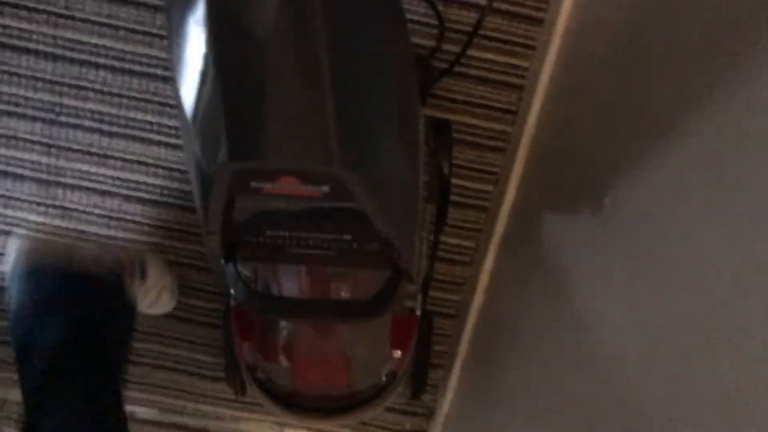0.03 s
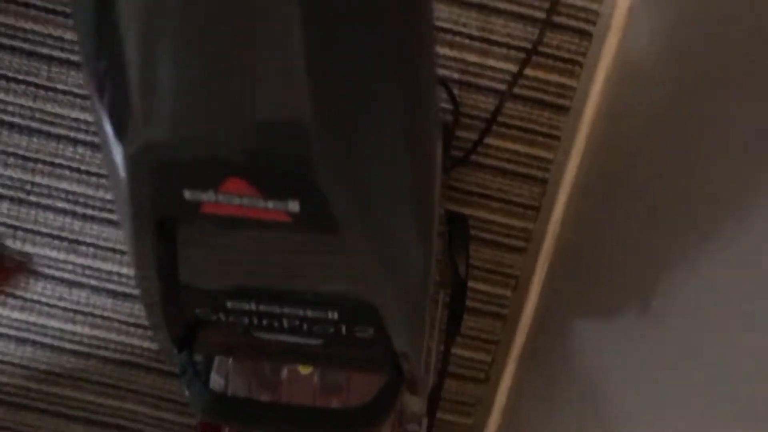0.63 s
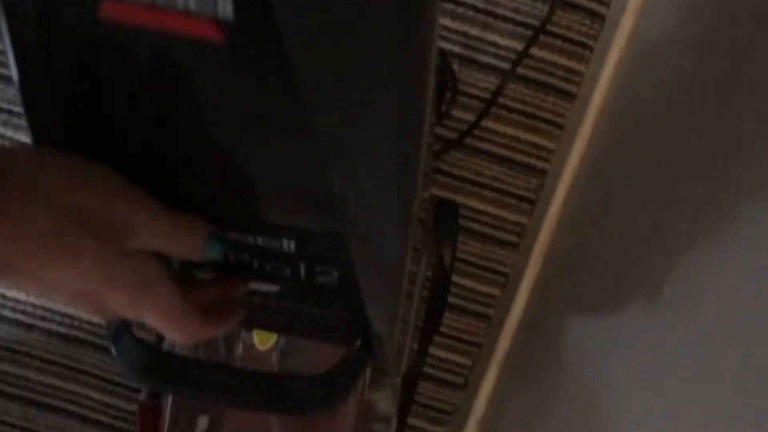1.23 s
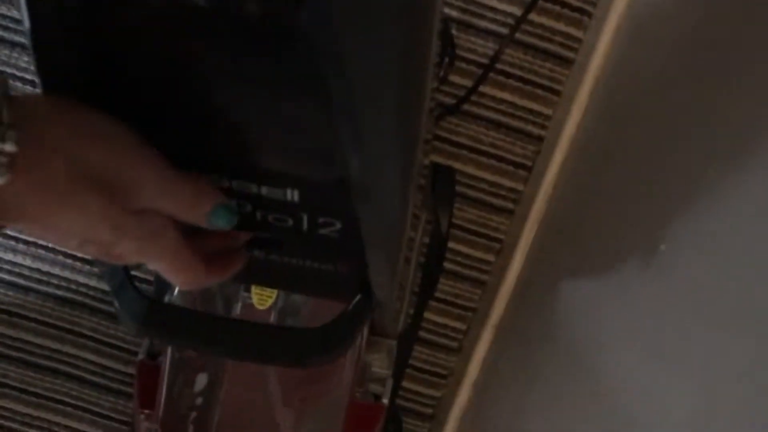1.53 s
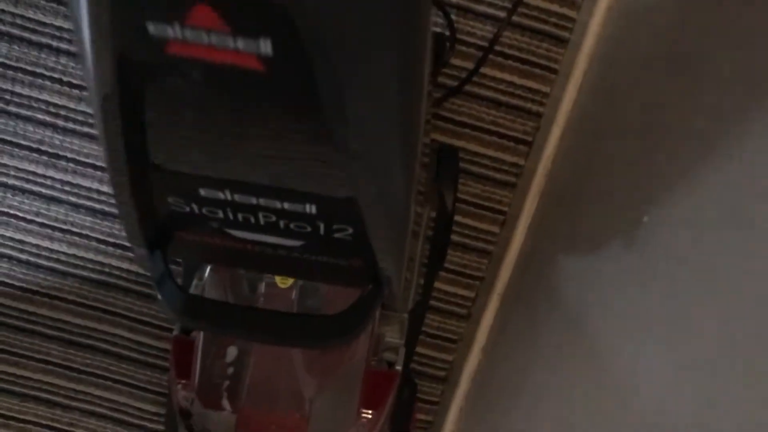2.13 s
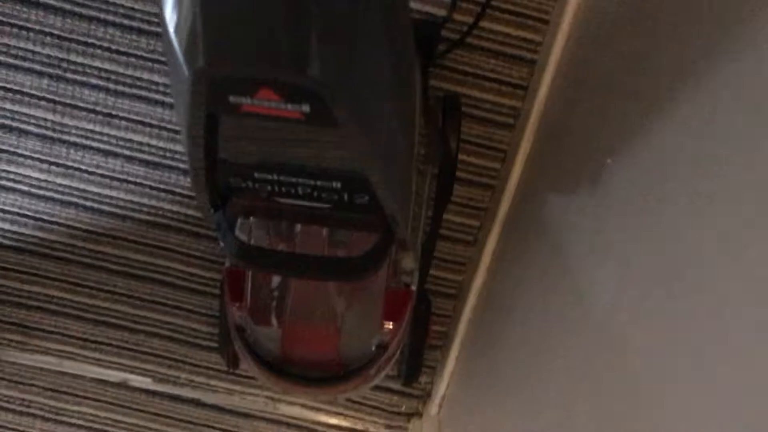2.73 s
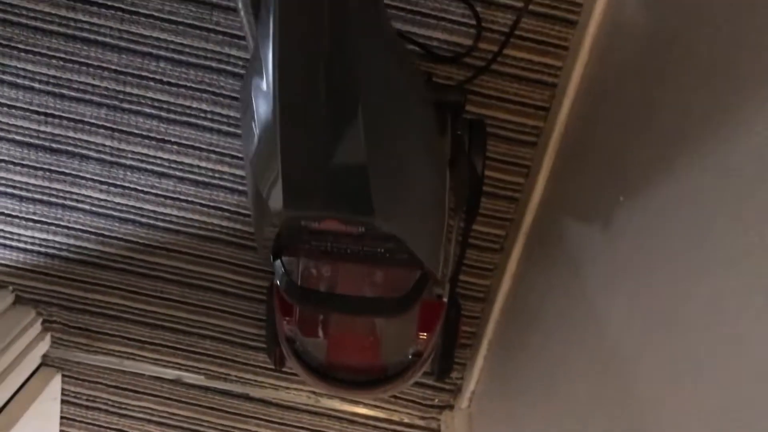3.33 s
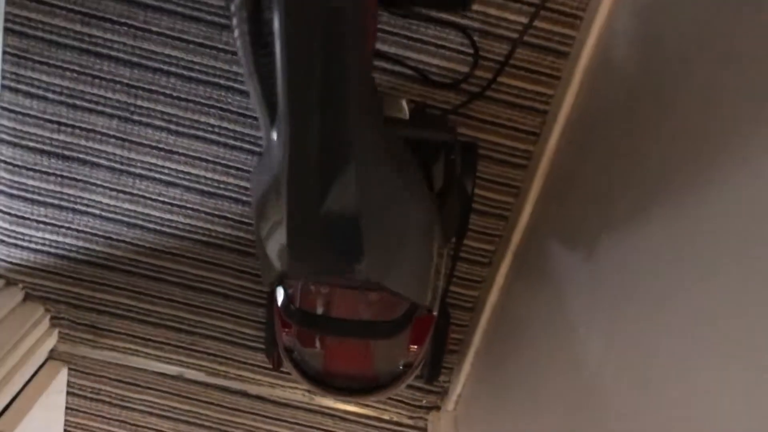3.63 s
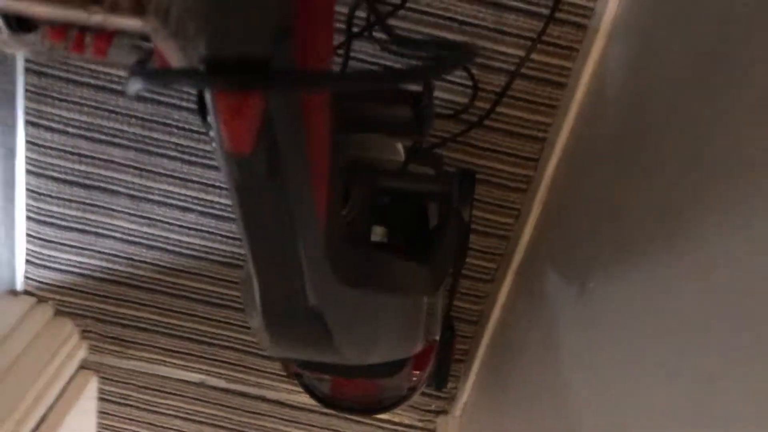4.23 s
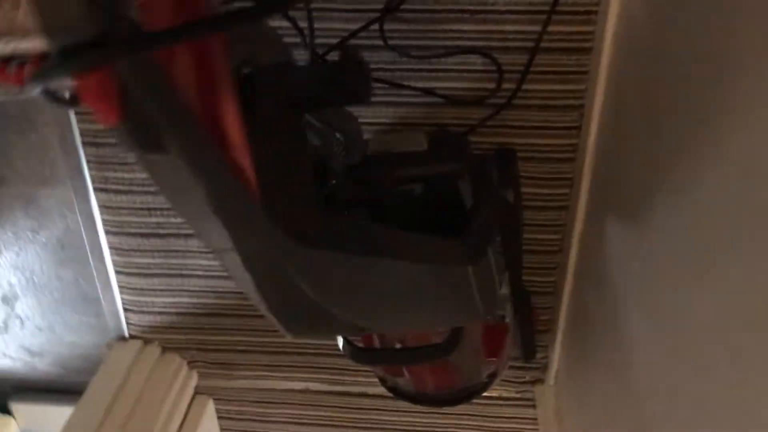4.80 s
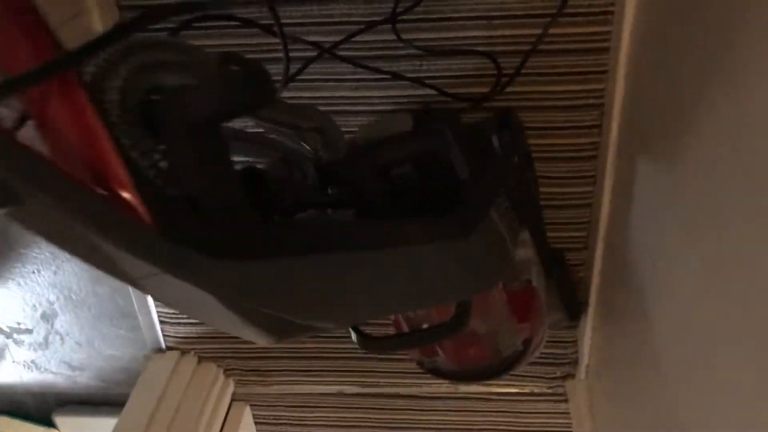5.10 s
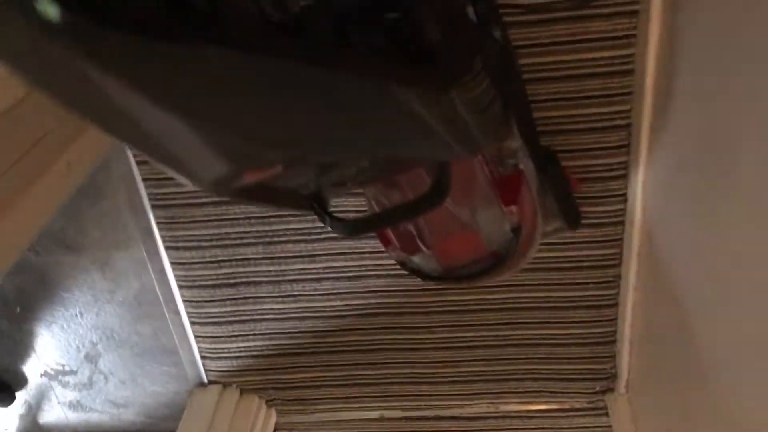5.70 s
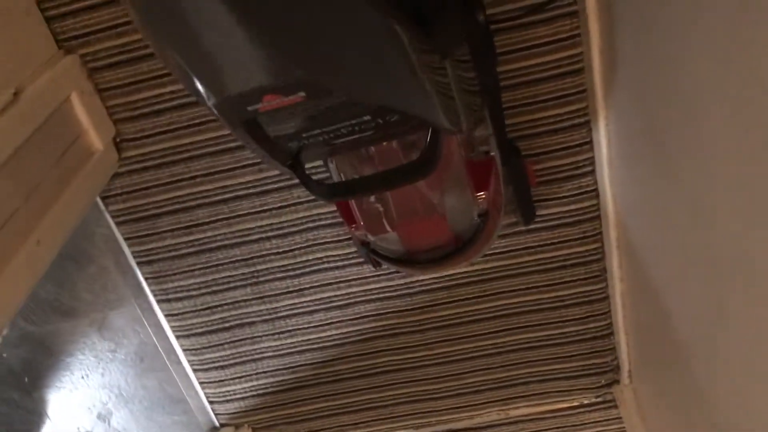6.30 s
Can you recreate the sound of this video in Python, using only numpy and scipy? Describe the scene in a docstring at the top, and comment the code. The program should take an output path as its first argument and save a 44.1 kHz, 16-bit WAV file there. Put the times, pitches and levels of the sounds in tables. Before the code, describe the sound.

Clothes rustle faintly, with small plastic ticks and a dull bump, as an upright carpet cleaner is handled close to the microphone in a small carpeted room. A switch clicks and the motor whines quickly up to a loud, steady roar of air, with a high whistle and a low brush hum. A sharp click follows soon after, and near the end the plastic body clunks while the motor keeps running.

```python
"""A small carpeted room, where an upright carpet cleaner is handled and switched on near a hand-held
microphone. The suction motor whines up to speed, its tones locked to the rotation of its shaft, over
turbulent air that resonates in plastic ducts. A second motor hums and turns the brush roll.
Clothes rustle by friction and plastic clicks before the start; later the body is tilted back and
clunks as the impacts excite its modes."""
import sys
import numpy as np
from scipy import signal
from scipy.fft import rfft, irfft
from scipy.io import wavfile

SR = 44100
rng = np.random.default_rng(int(sys.argv[2]) if len(sys.argv) > 2 else 0)


def wav_out(sig):
    """Save sig, one row per channel (or a flat mono array), as 16-bit PCM at SR to the path in sys.argv[1]."""
    wavfile.write(sys.argv[1], SR, np.round(np.clip(np.atleast_2d(sig).T, -1, 1) * 32767).astype(np.int16))


N = 288855
T = np.arange(N) / SR
HZ = np.maximum(np.arange(N // 2 + 1) * SR / N, 1)
RUNNING_S = np.maximum(T - 1.5, 0)   # time since switch-on
FULL_SPEED_HZ = 641.18

# directivity, how openly the motors face the microphone: time_s, gain_db
MOTOR_DIRECTIVITY = [(1.5, 13.5), (2.1, 9.5), (3.2, 8.5), (3.8, 3.5), (4.5, 5), (5.1, 8), (6.55, 2.5)]
# the same for the side with the exhaust vent and belt: time_s, gain_db
SIDE_DIRECTIVITY = [(1.5, 2.5), (2.9, -2.5), (3.8, 1), (4.5, 2.5), (5.15, 4.5), (5.55, 2.5), (5.85, -1.5),
                    (6.05, 1.5), (6.55, -1)]


def from_db(db):
    """Amplitude ratio of a level in decibels."""
    return 10 ** (np.asarray(db) / 20)


def rms_one(x):
    """Normalisation to unit rms."""
    return x / np.sqrt(np.mean(x ** 2) + 1e-20)


def in_time(rows):
    """Linear interpolation of (time_s, value) rows at every sample."""
    return np.interp(T, *np.transpose(rows))


def colour(points):
    """Spectral envelope, interpolated over log frequency."""
    hz, db = np.transpose(points)
    return from_db(np.interp(np.log(HZ), np.log(hz), db))


def resonances(peaks):
    """Frequency response of Lorentzian peaks and dips, summed in decibels."""
    return from_db(sum(db / (1 + (2 * (HZ - hz) / width) ** 2) for hz, width, db in peaks))


def noise(gain):
    """White noise filtered by a frequency response; rms 1."""
    return rms_one(irfft(rfft(rng.standard_normal(N)) * gain, N))


def resonant_noise(hz, width_hz):
    """Narrow-band noise, shaped by the squared response of a damped resonator; rms 1."""
    return noise(1 / (1 + ((HZ ** 2 - hz ** 2) / (HZ * width_hz)) ** 2))


def drift(rate_hz):
    """Random modulation: low-pass Gaussian noise with a spread near 1."""
    size, stride = 8192, 36
    hz = np.arange(size // 2 + 1) * SR / (stride * size)
    slow = irfft(rfft(rng.standard_normal(size)) * np.exp(-(hz / rate_hz) ** 2))
    return np.interp(T, np.arange(size) * stride / SR, rms_one(slow))


def turning(speed_hz, wobble):
    """Shaft angle as the integral of a slightly uneven speed."""
    return 2 * np.pi * np.cumsum(speed_hz * (1 + wobble * drift(12.44))) / SR


def tone(angle, scatter, rate_hz):
    """Interference: a partial beats with its reflections as the microphone moves; rms near 1."""
    reflected = drift(rate_hz) * np.sin(angle) + drift(rate_hz) * np.cos(angle)
    return (np.sqrt(2) * np.sin(angle) + scatter * reflected) / np.sqrt(1 + 2 * scatter ** 2)


def fan_speed():
    """Exponential run-up in turns per second: fast, slower under load, then a creep as the motor warms."""
    kick_share, kick_s, settle_s, creep_hz_per_s = .418, .0662, .2758, .661
    lag = kick_share * np.exp(-RUNNING_S / kick_s) + (1 - kick_share) * np.exp(-RUNNING_S / settle_s)
    return FULL_SPEED_HZ * (1 - lag) + creep_hz_per_s * RUNNING_S


def speed_share():
    """Fan speed as a fraction of full speed."""
    return np.clip(fan_speed() / FULL_SPEED_HZ, .01, 1)


def suction_motor():
    """Periodic forcing: imbalance sounds once a turn; fan and commutator whistle twelve times a turn."""
    # shaft tone as the microphone moves through its standing waves: time_s, level_db
    shaft_level = [(1.58, -42), (1.7, -17.5), (1.8, -26), (2.0, -21.5), (2.12, -16), (2.27, -21),
                   (2.48, -21), (2.66, -27.5), (3.3, -22.5), (4.0, -20), (4.48, -23), (4.71, -39),
                   (4.88, -26.5), (5.33, -27), (5.5, -39.5), (5.86, -22), (6.1, -21.5), (6.5, -16)]
    # fan whistle: time_s, level_db
    whistle_level = [(1.58, -60), (1.635, -29), (2.2, -35), (2.33, -28.5), (2.9, -29), (2.99, -38),
                     (3.1, -24.5), (3.4, -30), (3.85, -36.5), (4.15, -35), (4.36, -27), (4.73, -35),
                     (4.97, -27), (5.5, -41), (5.8, -33), (6.05, -43), (6.36, -29), (6.55, -43)]
    # weaker partials, the non-integer one likely from a ball bearing: shaft_multiple
    multiples = [2, 2.6, 3, 4]
    # their strengths: relative_db
    partial_db = [-41.5, -54.5, -44, -51.5]
    facing_db = in_time(MOTOR_DIRECTIVITY)
    angle = turning(fan_speed(), wobble=0.00044)
    # while the pitch climbs, late reflections are out of tune and the tones flutter
    climb = np.sqrt(1 - speed_share())
    shaft = from_db(in_time(shaft_level)) * tone(angle, scatter=0.12 + 0.21 * climb, rate_hz=29)
    whistle = from_db(in_time(whistle_level)) * tone(12 * angle, scatter=0.27 + 2.6 * climb, rate_hz=28)
    partials = sum(from_db(db) * tone(k * angle, scatter=1.0, rate_hz=17)
                   for k, db in zip(multiples, partial_db))
    overtone = from_db(-45 + .7 * facing_db) * speed_share() * tone(24 * angle, scatter=0.97, rate_hz=6)
    return shaft + whistle + overtone + from_db(facing_db) * speed_share() ** 1.2 * partials


def air_flow(level_db, flutter_db, attack_s):
    """Turbulence excites duct resonances; the low roar comes at once, the hiss builds with fan speed."""
    # spectrum of the turbulence: frequency_hz, density_db
    turbulence = [(25, -26), (50, -11), (112, -7.5), (165, 10.5), (260, 2.5), (340, 3.5), (520, -0.5),
                  (900, -5), (1700, -4), (2080, -9), (2900, -4), (5500, -7.5), (10300, -15.5), (15500, -18)]
    # duct resonances: centre_hz, width_hz, lift_db
    ducts = [(105, 4.3, 20), (318.9, 7.6, 10), (1810, 23, 3), (2305, 165, 8.5), (2560, 48, 5),
             (3115, 45, 7), (5960, 190, 7), (6570, 90, 6), (8700, 900, 3), (10240, 290, -4),
             (12000, 1100, 4)]
    # rumble, rush, hiss and top bands: centre_hz, gain_db, speed_exponent, motor_weight, side_weight
    bands = [(312, -1.5, -0.43, 0.016, -0.25), (1110, -0.4, 0.18, 0.44, 0.15),
             (3940, 0.1, 1.9, -0.077, 0.71), (10000, 1.5, 1.66, 0.2, -0.09)]
    roar_spectrum = rfft(noise(colour(turbulence) * resonances(ducts)))
    facing_db, side_db = in_time(MOTOR_DIRECTIVITY), in_time(SIDE_DIRECTIVITY)
    shares = np.array([np.exp(-(np.log(HZ / hz) / 0.78) ** 2) + 1e-100 for hz, *_ in bands])
    shares /= shares.sum(axis=0)   # the overlapping bands sum to 1
    out = np.zeros(N)
    for (_, db, exponent, motor_weight, side_weight), share in zip(bands, shares):
        band_db = db + motor_weight * facing_db + side_weight * side_db + flutter_db * drift(20)
        out += irfft(roar_spectrum * share, N) * speed_share() ** exponent * from_db(band_db)
    onset = 1 - np.exp(-(RUNNING_S / attack_s) ** 2)
    return from_db(level_db) * onset * out


def brush_drive(belt_ratio, run_up_s):
    """Rotational harmonics: the roll hums on the carpet; its faster belt motor adds drone and whine."""
    # roll speed, shifting with the drag of the carpet: time_s, speed_hz
    loaded_speed = [(1.5, 69.2), (2.3, 70.2), (3.1, 70), (3.7, 69.4), (4.5, 69.3), (5.1, 70.1),
                    (6.15, 68.4), (6.55, 69)]
    # hum of the roll: time_s, level_db
    hum_level = [(1.5, -64), (1.62, -35), (2.15, -29.5), (3.1, -29), (5.0, -30.5), (6.15, -33.5),
                 (6.55, -50)]
    # gear whine: time_s, level_db
    gear_level = [(1.55, -55), (1.73, -30.5), (2.95, -29), (3.5, -50), (4.55, -38), (5.0, -28.5),
                  (5.5, -44), (5.95, -29), (6.55, -26)]
    # weaker partials: roll_multiple
    multiples = [5, 12, 15, 34]
    # their strengths: relative_db
    partial_db = [-65, -47, -51.5, -43.5]
    speed_hz = in_time(loaded_speed) * (1 - np.exp(-RUNNING_S / run_up_s))
    roll = turning(speed_hz, wobble=0.0014)
    motor = belt_ratio * roll
    bristles, poles, slots, teeth = 6 * roll, 2 * motor, 4 * motor, 6 * motor
    hum = from_db(in_time(hum_level)) * tone(roll, scatter=.03, rate_hz=4)
    drone = tone(bristles, scatter=0.48, rate_hz=5.1) + tone(poles, scatter=0.26, rate_hz=4.4)
    drone += from_db(-2.5) * tone(motor, scatter=0.98, rate_hz=2.0)
    drone += from_db(-7.5) * tone(slots, scatter=1.0, rate_hz=2.0)
    drone *= from_db(-36.5 + 1.5 * in_time(SIDE_DIRECTIVITY))
    gear = from_db(in_time(gear_level)) * tone(teeth, scatter=0.44, rate_hz=64)
    partials = sum(from_db(db) * tone(k * roll, scatter=0.4, rate_hz=21.0)
                   for k, db in zip(multiples, partial_db))
    return hum + gear + speed_share() * (drone + from_db(in_time(MOTOR_DIRECTIVITY)) * partials)


def exhaust_vent(waver_db, waver_hz):
    """Flow-excited resonance: air leaving the slots sounds hollow notes that vary with direction."""
    # outlet resonances: pitch_hz, width_hz, level_db, side_weight, motor_weight
    notes = [(2303, 190, -39, -.2, 0.49), (3333, 205, -39, 2.33, 0.22), (4560, 320, -33.5, 0.19, -0.15)]
    # the shrillest note, swelling as the microphone crosses its narrow beam: time_s, level_db
    shrill_level = [(1.5, -33), (3.6, -36), (4.2, -31), (4.7, -34.5), (5.15, -39), (5.35, -25.5),
                    (5.78, -40), (6.0, -29), (6.3, -38), (6.55, -35)]
    facing_db, side_db = in_time(MOTOR_DIRECTIVITY), in_time(SIDE_DIRECTIVITY)
    out = from_db(in_time(shrill_level)) * resonant_noise(hz=5380, width_hz=320)
    for hz, width_hz, db, side_weight, motor_weight in notes:
        note_db = db + side_weight * side_db + motor_weight * facing_db + waver_db * drift(waver_hz)
        out += from_db(note_db) * resonant_noise(hz, width_hz)
    return speed_share() ** 1.65 * out


def switch_on(level_db, rise_s, pulsing):
    """Inrush current swells and dies, shaking the housing twice per mains cycle so that it growls."""
    # housing resonances driven by the surge: pitch_hz, width_hz, relative_db
    modes = [(1007, 87, 0.5), (1400, 270, -9)]
    age = RUNNING_S / rise_s
    surge = from_db(level_db) * age * np.exp((1 - age ** 2) / 2)
    mains_pulse = np.sin(2 * np.pi * 100 * T)
    ringing = sum(from_db(db) * resonant_noise(hz, width_hz) for hz, width_hz, db in modes)
    return surge * ringing * (1 + pulsing * mains_pulse)


def clicks(crack_db, crack_s, ring_db, room_db, room_t60_s):
    """Impact excitation: a short crack, the damped ring of part and housing, and faint reverberation."""
    # touches on the plastic: start_s, relative_db, brightness_hz, ring_hz, t60_s
    touches = [(0.111, -39, 5000, 3000, 0.23), (0.15, -40, 3000, 1100, 0.17),
               (0.202, -39, 12000, 12000, 0.022), (0.232, -27, 2000, 700, 0.059),
               (0.368, -31.5, 2000, 690, 0.17), (0.411, -42, 4000, 4240, 0.1),
               (0.509, -45.5, 9000, 11000, 0.036), (0.641, -31, 11900, 11800, 0.03),
               (0.715, -39.5, 1200, 800, .08), (1.017, -38, 3000, 2480, 0.037),
               (1.098, -38.5, 9000, 9050, .025), (1.113, -33, 3000, 1290, .04),
               (1.122, -43, 7000, 5000, .03), (1.132, -29, 1400, 890, 0.055),
               (1.222, -31.5, 1800, 1510, 0.08), (1.254, -33.5, 3500, 1110, 0.033),
               (1.336, -41, 1000, 895, 0.07), (1.51, -18.5, 1210, 1050, .08),
               (2.226, -13, 13900, 12500, 0.033), (2.232, -7.5, 6000, 4460, 0.033),
               (2.241, -12, 4000, 2600, 0.092), (5.674, -17, 8000, 9000, 0.027),
               (5.678, 1.5, 6940, 1820, 0.032), (5.687, -16.5, 3500, 1180, 0.13),
               (5.7, -7.5, 3500, 2230, 0.12)]
    # housing resonances: centre_hz, width_hz, lift_db
    housing = [(410, 150, 20), (736, 220, 10.5), (994, 66, 16.5), (1300, 140, 13.5), (1580, 340, 8.5),
               (3700, 2200, 7.5), (5160, 300, 7)]
    out = np.zeros(N)
    ringing = noise(resonances(housing) * HZ / (HZ + 200))
    for start_s, db, brightness_hz, ring_hz, t60_s in touches:
        start = int(start_s * SR)
        age = T[:N - start][:SR // 2]
        span = slice(start, start + len(age))
        burst = signal.lfilter(*signal.butter(1, brightness_hz, fs=SR), ringing[span])
        part_note = signal.lfilter(*signal.iirpeak(ring_hz, 10, fs=SR), burst)
        click = rms_one(burst + from_db(ring_db) * part_note)
        crack = from_db(crack_db) * np.exp(-age / crack_s)
        ring_decay = from_db(-60 * age / t60_s)
        room_tail = from_db(room_db - 60 * age / room_t60_s)
        out[span] += from_db(db - 12.0) * click * (crack + ring_decay + room_tail)
    return out


def thumps():
    """Modal response: soft force pulses set the heavy body ringing in a few damped low modes."""
    # dull blows: start_s, impulse_db, contact_s
    blows = [(0.003, -46, 0.0044), (0.078, -48, 0.0036), (0.618, -50, 0.0023), (0.709, -54, 0.0073),
             (0.8, -50, 0.0014), (0.82, -35.5, 0.0054), (0.861, -23, 0.013), (0.882, -22, .012),
             (4.971, -21, 0.0035), (5.029, -33, 0.0065), (5.651, -24, 0.0018), (5.684, -19.5, 0.0013),
             (5.693, -11, 0.0028), (5.711, -17.5, 0.0024), (6.223, -26, 0.0032)]
    # body modes: pitch_hz, gain_db, t60_s
    modes = [(64, 6, 0.12), (88, -22, 0.1), (143, 0.5, 0.38), (177.4, 9.5, 0.1), (242, 3, 0.27),
             (361, 4, 0.15), (550, 1, 0.12)]
    force, out = np.zeros(N), np.zeros(N)
    for start_s, db, contact_s in blows:
        start = int(start_s * SR)
        push = np.hanning(int(contact_s * SR) + 3)
        force[start:start + len(push)] += from_db(db) * push / push.sum()
    force += 1e-18 * (-1) ** np.arange(N)   # keeps the filters from underflowing
    for hz, db, t60_s in modes:
        radius, angle = from_db(-60 / (t60_s * SR)), 2 * np.pi * hz / SR
        out += from_db(db) * signal.lfilter([1, -1], [1, -2 * radius * np.cos(angle), radius ** 2], force)
    return out


def handling(grain_db, ticks_per_s, tick_db):
    """Friction noise: the grip rumbles, and cloth rubs in uneven grains with a few bright ticks."""
    # grip and sleeves, holding the last faint levels to the end: time_s, rumble_db, rustle_db
    movement = [(0.0, -46, -55), (0.16, -55, -49.5), (0.32, -53.5, -62.5), (0.58, -64, -61.5),
                (0.68, -49, -55.5), (0.8, -50, -56.5), (0.94, -55, -66), (1.01, -42, -58),
                (1.2, -52.5, -65), (1.49, -58, -61)]
    # spectrum of the grip: frequency_hz, density_db
    grip = [(25, -10), (65, 2.5), (110, -7.5), (200, -4.5), (350, -15.5), (800, -29), (3000, -55)]
    # spectrum of the cloth: frequency_hz, density_db
    cloth = [(150, -11), (500, -5.5), (1300, -2.5), (2500, -8.5), (5000, -12.5), (8000, -17), (15000, -19)]
    time_s, rumble_db, rustle_db = np.transpose(movement)
    rustle = rms_one(noise(colour(cloth)) * from_db(grain_db * drift(150)))
    snags = (rng.random(N) < ticks_per_s / SR) * rng.standard_normal(N)
    ticks = rms_one(signal.lfilter(*signal.butter(2, 7000, "high", fs=SR), snags + 1e-18))
    rumble = from_db(np.interp(T, time_s, rumble_db)) * noise(colour(grip))
    sleeves = from_db(np.interp(T, time_s, rustle_db)) * (rustle + from_db(tick_db) * ticks)
    return rumble + sleeves


def scene():
    """Superposition: all sources add at one microphone, heard alike in both ears."""
    air = air_flow(level_db=-22.5, flutter_db=1.0, attack_s=0.025)
    air += exhaust_vent(waver_db=2.1, waver_hz=3.5)
    motors = suction_motor() + brush_drive(belt_ratio=2.83, run_up_s=.045)
    motors += switch_on(level_db=-26, rise_s=0.084, pulsing=0.26)
    touches = clicks(crack_db=3, crack_s=0.00086, ring_db=13.5, room_db=-9.0, room_t60_s=0.21) + thumps()
    touches += handling(grain_db=1.0, ticks_per_s=14, tick_db=-12)
    return np.tile((air + motors) * (RUNNING_S > 0) + touches, (2, 1))


def record(dry):
    """Band limiting and clipping: the microphone drops the deepest bass, the peaks and the top treble."""
    low_cut_hz, high_cut_hz = 43, 15800
    thin = signal.sosfilt(signal.butter(3, low_cut_hz, "high", fs=SR, output="sos"), dry)
    clipped = np.clip(thin, -.92, .92)
    return signal.sosfilt(signal.ellip(16, .1, 90, high_cut_hz, fs=SR, output="sos"), clipped)


dry = scene()
out = record(dry)
wav_out(out)
```